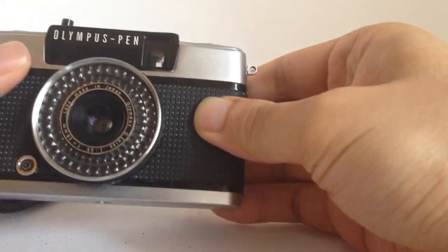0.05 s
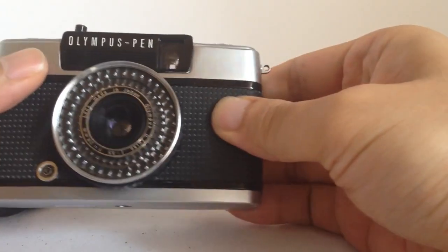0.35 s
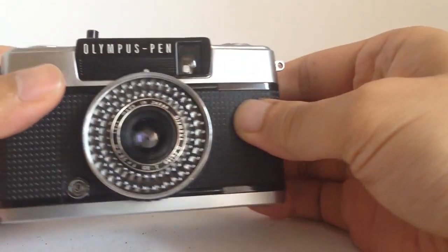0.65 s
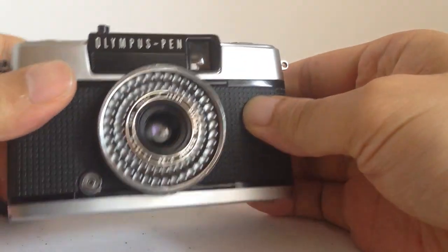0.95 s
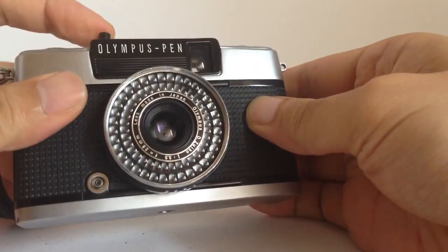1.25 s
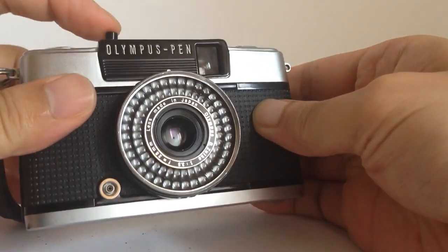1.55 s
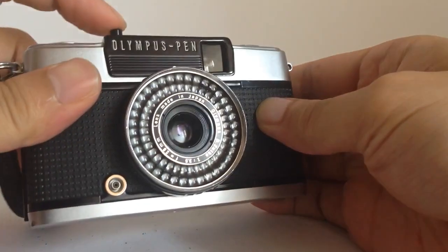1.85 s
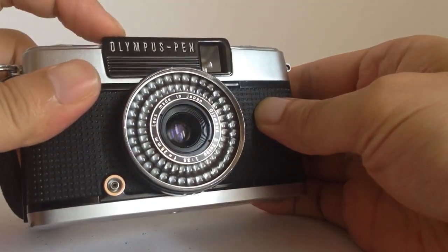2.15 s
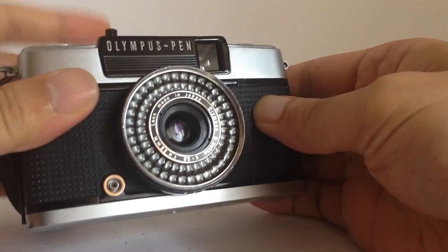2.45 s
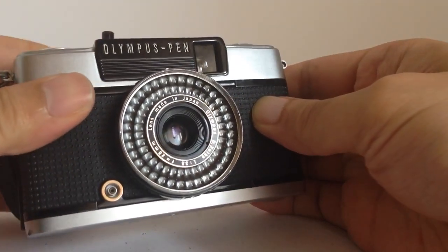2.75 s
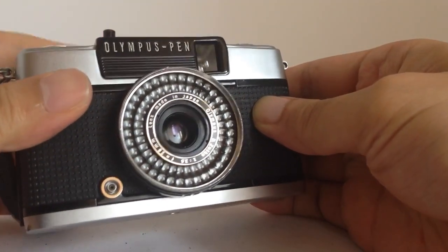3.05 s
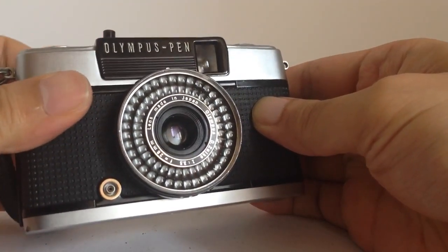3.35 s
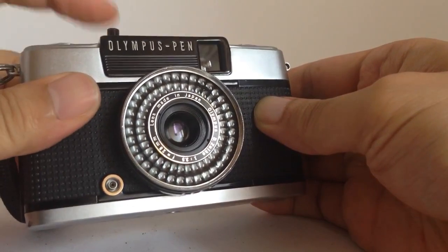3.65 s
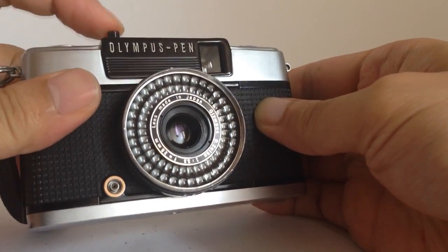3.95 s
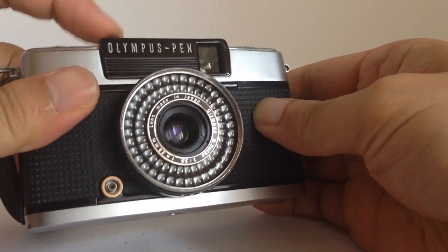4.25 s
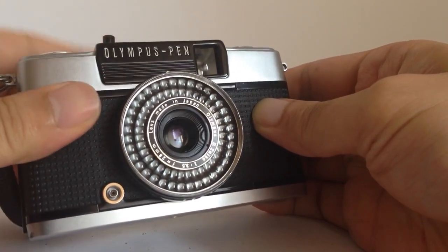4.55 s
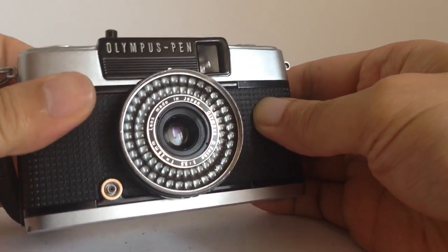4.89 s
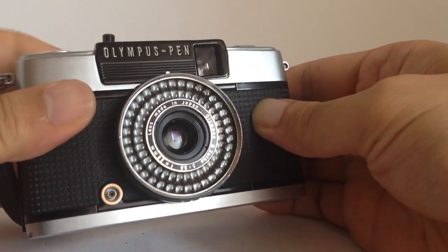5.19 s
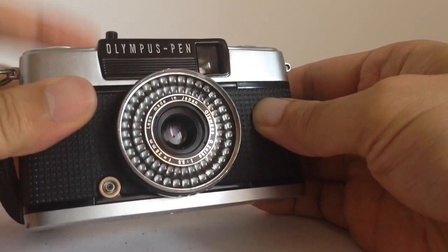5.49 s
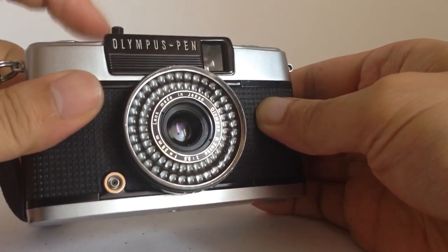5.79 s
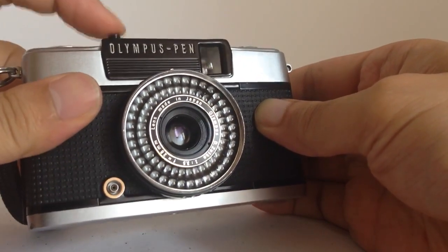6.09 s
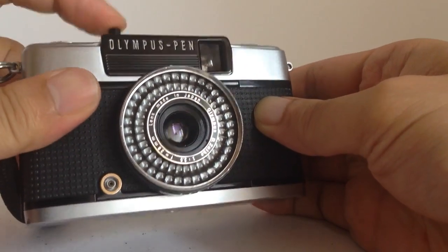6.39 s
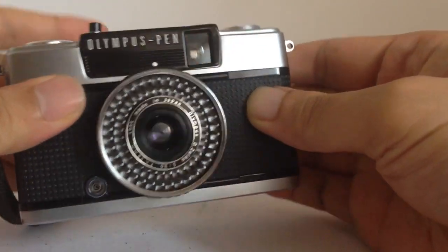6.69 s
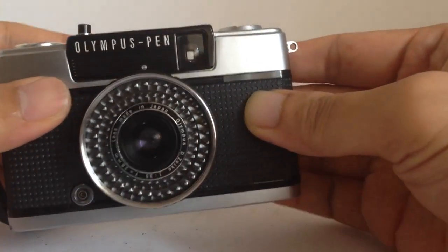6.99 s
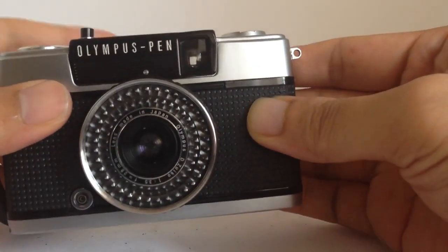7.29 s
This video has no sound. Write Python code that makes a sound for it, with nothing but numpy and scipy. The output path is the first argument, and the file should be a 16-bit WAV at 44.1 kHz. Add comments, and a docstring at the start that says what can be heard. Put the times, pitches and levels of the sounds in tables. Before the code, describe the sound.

A small film camera is handled close to the microphone in a quiet room with a short reverberation and a low hush. Right at the start its thumb wheel ratchets in a quick run of clicks, followed by a few separate ticks and gear knocks until about 1.2 seconds. At about 2.1 seconds the button latches and the shutter snaps, sharp and metallic with a tiny rattle; the button springs back at 2.4. Winding comes again in fast bursts from 2.9 to 3.6 seconds, the shutter fires at 4.2 and the button returns at 4.4. More ratcheting runs from 4.8 to 5.6 seconds, ending in a firm knock. The third shutter snap falls at 6.3, with the button's release at 6.5. A last winding run and several gear knocks fill 7.1 to 7.5 seconds. Faint finger rubs and soft bumps on the case come in between.

```python
"""Winding and firing a film camera

A small camera is wound and fired three times, close by, in a quiet room. Each click is an impact that
excites the resonant modes of the case: a pawl snaps over the thumb wheel's teeth, gears take up their
play, the button latches, the shutter opens, shuts and rebounds, and the button springs back.
Fingers rub and bump the case; the room adds a short reverberation and a low hush."""
import sys
import numpy as np
from scipy import signal
from scipy.fft import rfft, irfft
from scipy.io import wavfile
from scipy.ndimage import uniform_filter1d

SR = 44100
rng = np.random.default_rng(int(sys.argv[2]) if len(sys.argv) > 2 else 0)


def log_audio(samples):
    """Write samples as a 16-bit WAV file to the path given in sys.argv[1]."""
    # one column per channel
    frames = np.atleast_2d(samples).T
    # limit to full scale, then quantise
    limited = np.clip(frames, -1, 1)
    pcm = np.round(limited * 32767).astype(np.int16)
    wavfile.write(sys.argv[1], SR, pcm)


N = 332073


def amp(db):
    """Amplitude ratio of a level in decibels."""
    return 10 ** (np.asarray(db) / 20)


def unit(x):
    """Normalisation to unit energy."""
    return x / np.sqrt(np.sum(x ** 2) + 1e-20)


def curve_at(points, hz):
    """Interpolation on a logarithmic frequency axis."""
    freqs, values = np.transpose(points)
    return np.interp(np.log(hz + 1), np.log(freqs + 1), values)


def add(mix, start_s, sound):
    """Superposition: a sound joins the mix at start_s."""
    part = mix[max(round(start_s * SR), 0):][:len(sound)]
    part += sound[:len(part)]


def noise(spectrum):
    """Spectral shaping of white noise, scaled to an rms of 1."""
    gain = amp(curve_at(spectrum, np.fft.rfftfreq(N, 1 / SR)))
    return np.sqrt(N) * unit(irfft(rfft(rng.standard_normal(N)) * gain, N))


def minimum_phase(gain):
    """Causality: the impulse response with this gain that starts at once and dies away."""
    log_gain = np.log(np.maximum(gain, 1e-5))
    mirrored = np.r_[log_gain, log_gain[-2:0:-1]]
    return np.fft.ifft(np.exp(np.conj(signal.hilbert(mirrored)))).real


def case_response(modes, hz, cutoff_hz, spread):
    """Modal summation: resonances add in power, and the small case radiates little below cutoff_hz."""
    power = 0
    for pitch_hz, bandwidth_hz, db in modes:
        widening = spread if pitch_hz > 3000 else 1
        detuning = (hz - pitch_hz ** 2 / hz) / (bandwidth_hz * widening)
        power += amp(db) ** 2 / widening / (1 + detuning ** 2)
    power *= 1 / (1 + (cutoff_hz / hz) ** 8) + amp(-24) * hz ** 2 / (hz ** 2 + cutoff_hz ** 2)
    return np.sqrt(power / power.mean())


def contact_force(t, rise_s, hold_s):
    """Broadband excitation: a flurry of hard metal contacts drives all frequencies alike."""
    age = np.maximum(t, 0)
    envelope = (1 - np.exp(-age / rise_s)) * np.exp(-(age / hold_s) ** 2)
    spectrum = rfft(envelope * rng.standard_normal(len(t)))
    spectrum /= np.sqrt(abs(uniform_filter1d(abs(spectrum) ** 2, size=60)) + 1e-12)
    return unit(irfft(spectrum) * (t > 0))


# An impact row is: start_s, level_db, body_db, edge_db, slide_db. Levels are relative; body_db lifts
# the band under 3 kHz, edge_db the band over 6.2 kHz, and slide_db sets the slide against the snap.
def impacts(rows, modes, gain_db, cutoff_hz, rise_s, hold_s, rattle_db, rattle_t60_s, slide_s,
            spread=1, snap_spread=1):
    """Source and filter: a part slides, snaps over its edge and rattles, all through the case's modes."""
    size, lead_s = 4096, 0.01
    t = np.arange(size) / SR - lead_s
    hz = np.fft.rfftfreq(size, 1 / SR) + 1
    age, out = np.maximum(t, 0), np.zeros(N)
    tight = case_response(modes, hz, cutoff_hz, snap_spread)
    loose = case_response(modes, hz, cutoff_hz, spread)  # loose parts blur the upper resonances
    body_band = 1 / (1 + (hz / 3000) ** 8)
    edge_band = 1 / (1 + (6200 / hz) ** 8)
    slide_envelope = np.clip((t + slide_s) * SR / 20, 0, 1) * (t < 0)
    rattle_envelope = (1 - np.exp(-age / hold_s)) * amp(-60 * age / rattle_t60_s)
    for start_s, db, body_db, edge_db, slide_db in rows:
        slide = amp(slide_db) * unit(rng.standard_normal(size) * slide_envelope)
        rattle = amp(rattle_db) * unit(rng.standard_normal(size) * rattle_envelope)
        snap = contact_force(t, rise_s, hold_s)
        colour = amp(db + gain_db + body_db * body_band + edge_db * edge_band)
        for force, case in (snap, tight), (slide + rattle, loose):
            response = minimum_phase(case * colour)[:size // 2]
            add(out, start_s - lead_s, signal.fftconvolve(force, response))
    return out


def placed(pattern, start_s, strength_db):
    """Time shift and gain applied to a pattern of impact rows."""
    return [(start_s + delay_s, db + strength_db, *colour) for delay_s, db, *colour in pattern]


def with_ring(row, ring_db):
    """Band emphasis: an impact's 3-6 kHz ring changes while its body and edge stay level."""
    start_s, db, body_db, edge_db, slide_db = row
    return start_s, db + ring_db, body_db - ring_db, edge_db - ring_db, slide_db


# spectrum of the room's background: frequency_hz, level_db
HUSH_SPECTRUM = [(12, -26), (20, 1), (122, -1), (171, -5.5), (213, -8.5), (282, -8.5), (324, -10.5),
                 (452, -12), (686, -17), (767, -14.5), (932, -21.5), (4070, -17), (5690, -18),
                 (13900, -20.5), (15500, -21.5)]
def hush():
    """Stationary noise, strongest in the bass."""
    return amp(-65) * noise(HUSH_SPECTRUM)


# reverberation time: frequency_hz, t60_s
ROOM_DECAY = [(300, 0.18), (900, 0.12), (2000, 0.11), (4200, .15), (8000, 0.17), (15000, 0.054)]
# spectrum of the tail: frequency_hz, level_db
ROOM_SPECTRUM = [(300, 0), (900, -3), (1700, 2), (2600, 8), (3550, -0.5), (4150, -5), (4800, -4),
                 (8000, -8), (15000, 2)]
def room(x, tail_db=-13.5, onset_s=0.0017, echo_s=0.039, echo_db=-39):
    """Reverberation: a diffuse tail, each band decaying at its own rate, and one echo off a wall."""
    t = np.arange(SR // 2) / SR
    reflections = rng.standard_normal(len(t)) * np.clip((t - onset_s) / 0.0077, 0, 1)
    hz, age, bands = signal.stft(reflections, SR, nperseg=256)
    bands *= amp(curve_at(ROOM_SPECTRUM, hz)[:, None] - 60 * age / curve_at(ROOM_DECAY, hz)[:, None])
    response = amp(tail_db) * unit(signal.istft(bands, SR, nperseg=256)[1])
    response[round(echo_s * SR)] += amp(echo_db)
    return signal.fftconvolve(x, response)[:N]


# skin sliding on the case: start_s, length_s, level_db
SKIN_RUBS = [(1.464, 0.16, -64), (1.79, 0.25, -63), (3.042, 0.069, -66), (6.876, 0.091, -62.5),
             (7.082, 0.085, -57.5), (7.183, 0.093, -63.5)]
# spectrum of the rubbing: frequency_hz, level_db
RUB_SPECTRUM = [(24, -37.5), (40, -16), (140, -0.5), (254, -13), (407, -11), (469, -19), (563, -20.5),
                (900, -26), (1170, -58), (1980, -120)]
def finger_rubs():
    """Friction noise swells and fades with the pressure of the skin."""
    pressure = np.zeros(N)
    for start_s, length_s, db in SKIN_RUBS:
        add(pressure, start_s, amp(db) * signal.windows.tukey(round(length_s * SR), 0.6))
    return pressure * noise(RUB_SPECTRUM)


# soft blows on the case: start_s, level_db, pitch_hz, t60_s
FINGER_BUMPS = [(1.555, -52.5, 135, 0.17), (2.355, -54, 71, 0.096), (3.248, -41, 94, 0.07),
                (4.107, -44, 123, 0.081), (5.247, -45, 90, .07), (5.421, -48, 85, 0.059),
                (5.962, -42, 86, 0.07), (6.504, -47, 79.8, 0.11), (6.56, -53.5, 70, 0.088)]
def finger_bumps():
    """Damped oscillation: flesh quickly absorbs a low mode and a weaker upper one."""
    t, out = np.arange(SR // 3) / SR, np.zeros(N)
    for start_s, db, hz, t60_s in FINGER_BUMPS:
        wave = np.sin(2 * np.pi * hz * t) + 0.22 * np.sin(2 * np.pi * hz * 1.6 * t)
        envelope = amp(db - 60 * t / t60_s) * (1 - np.exp(-t / 0.002))
        add(out, start_s, envelope * wave)
    return out


# small shifts of the grip: start_s, level_db
GRIP_SHIFTS = [(1.134, -43.5), (1.553, -48), (1.863, -50), (1.909, -54.5), (2.9, -48), (5.273, -46),
               (5.884, -48.5), (6.212, -45), (6.792, -49), (7.063, -48)]
def grip_ticks():
    """Weak impulses: the shifting grip excites the same modes as the gears do."""
    ticks = [(start_s, db, 0, 0, -12) for start_s, db in GRIP_SHIFTS]
    return impacts(ticks, GEAR_MODES, gain_db=9.5, cutoff_hz=498, rise_s=0.0005, hold_s=0.0019,
                   rattle_db=1.5, rattle_t60_s=0.15, slide_s=0.0022)


# springs and thin plates: pitch_hz, level_db, t60_s
SPRING_MODES = [(778, -70.5, .55), (1622, -76, .14), (2055, -70.5, .1), (3720, -75, .16), (4100, -82, .22),
                (4425, -76, .26)]
def springs(x):
    """Sympathetic vibration: lightly damped parts pick up each blow and ring on."""
    t = np.arange(SR // 2) / SR
    ring = sum(amp(db - 60 * t / t60_s) * np.sin(2 * np.pi * hz * t) for hz, db, t60_s in SPRING_MODES)
    return signal.fftconvolve(x, ring)[:N]


# the back door, damped by the hands: nominal_pitch_hz, level_db, t60_s
BACK_DOOR_MODES = [(330, -24, .06), (430, -20, .05), (735, -2, .038), (850, -6, .033)]
def back_door(jolts, rise_s, pitch_ratio, gain_db):
    """Plate vibration: the thin door swings into a short hollow boom just after each jolt."""
    t, out = np.arange(SR // 8) / SR, np.zeros(N)
    swell = 1 - np.exp(-t / rise_s)
    for start_s, jolt_db in jolts:
        tuning = pitch_ratio * (1 + 0.025 * rng.uniform(-0.89, 1))  # the grip shifts the pitch a little
        boom = sum(amp(db - 60 * t / t60_s) * np.sin(2 * np.pi * hz * tuning * t)
                   for hz, db, t60_s in BACK_DOOR_MODES)
        add(out, start_s + 0.0015, amp(jolt_db + gain_db) * swell * boom)
    return out


# the case as the lever strikes it: pitch_hz, bandwidth_hz, level_db
LEVER_MODES = [(760, 110, -7), (1700, 90, 3), (4300, 900, -23), (9000, 3000, -23)]
# returns of the lever: start_s, level_db
LEVER_RETURNS = [(2.4462, -30.5), (4.5, -31.5), (6.569, -32.5)]
def lever():
    """A light impact, mostly rattle: a lever resets once the button is up."""
    clicks = [(start_s, db, 0, 0, -21) for start_s, db in LEVER_RETURNS]
    return impacts(clicks, LEVER_MODES, gain_db=-4.5, cutoff_hz=650, rise_s=0.00037, hold_s=0.0013,
                   rattle_db=6.5, rattle_t60_s=0.018, slide_s=0.0026)


# the case as the gears strike it: pitch_hz, bandwidth_hz, level_db
GEAR_MODES = [(820, 59, -2), (1317, 210, -8.5), (1672, 89, -1.5), (2095, 400, -8), (2510, 31, -7),
              (3080, 2000, -16), (4130, 630, -8.5), (4740, 370, -11), (5790, 250, -9.5), (7520, 990, -15.5),
              (9500, 1100, -29), (14300, 212, -32.5)]
# gear teeth meeting: start_s, level_db, body_db, edge_db
BACKLASH_KNOCKS = [(.2638, -38, 11.5, -4), (0.274, -15.5, 0.5, 6.5), (1.1553, -30, -7, 2),
                   (1.164, -15, 1.5, -11), (2.8766, -28.5, -1.5, -3), (3.0905, -14, 0.5, -0.5),
                   (3.2515, -20.5, 3, -6.5), (3.6332, -17, -0.5, -4.5), (4.8073, -30, -10, -9),
                   (5.1209, -14, -1, -7.5), (5.2475, -39, 3, -5), (5.5992, -9.5, 2, -2.5),
                   (5.9645, -36.5, 11.5, -7), (7.333, -16.5, -3, -18), (7.3448, -18, 5.5, -10),
                   (7.3565, -20.5, -5, 3), (7.4887, -22.5, 0.5, -7), (7.5074, -29, 11, -7)]
def gears(slide_db=-11):
    """Backlash: the gears knock as they take up their play, and sharp knocks jolt the door."""
    rows = [(*knock, slide_db) for knock in BACKLASH_KNOCKS]
    knocks = impacts(rows, GEAR_MODES, gain_db=1.5, cutoff_hz=664, rise_s=0.000098, hold_s=0.0028,
                     rattle_db=-4, rattle_t60_s=0.036, slide_s=0.0036)
    jolts = [(start_s, db + edge_db) for start_s, db, _, edge_db in BACKLASH_KNOCKS]
    # a winding hand holds the door tighter, which raises its pitch
    return knocks + back_door(jolts, rise_s=0.00087, pitch_ratio=1.103, gain_db=-27.5)


def pawl_snaps(stroke, easy_teeth_per_s=60):
    """An impulse train: one snap for each tooth, at a rate set by the speed of the wheel."""
    start_s, count, db, body_db, edge_db, slide_db, speeds = stroke
    log_speed = np.polyfit(np.linspace(0, 1, len(speeds)), np.log(speeds), len(speeds) - 1)
    rows = []
    for tooth in range(count):
        progress = min(tooth / max(count - 2, 1), 1)
        speed = np.exp(np.polyval(log_speed, progress))
        octaves = np.log2(speed / easy_teeth_per_s)  # a faster wheel sounds fuller and sharper
        ease_db = -0.5 if tooth == count - 1 else 0  # the thumb eases off
        snap = (start_s, db + ease_db, body_db + 3 * octaves, edge_db + 2.5 * octaves,
                slide_db - 3.5 * tooth)
        rows.append(with_ring(snap, -0.34 * tooth))  # slide and ring fade as the push goes on
        start_s += 1 / speed
    return rows


# the case as the pawl strikes it: pitch_hz, bandwidth_hz, level_db
PAWL_MODES = [(776, 56, -3.5), (1111, 56, -4.5), (1635, 187, -2.1), (2056, 90, 1), (2495, 99, -5.5),
              (3887, 320, -2), (4205, 130, -1), (4825, 200, -3.5), (5450, 280, -3.5), (7390, 740, -6.5),
              (8160, 220, -4.5), (9570, 200, -9.5), (10300, 530, -10.5), (13200, 920, -16),
              (15600, 4400, -22.5)]
# a side panel, free until the hand closes: pitch_hz, bandwidth_hz, level_db
PANEL_MODES = [(2140, 120, 3.5)]
# pushes on the wheel: start_s, tooth_count, level_db, body_db, edge_db, slide_db, speeds_teeth_per_s
THUMB_STROKES = [(0.0459, 9, -8.5, -2.5, 3, -30, [35.7, 81.4, 61.9, 57.4]),
                 (0.5533, 2, -11, 1.5, 5.5, -29, [41.7]), (2.9113, 3, -4, -1.5, -4, -6.5, [68, 60]),
                 (2.963, 11, -5, -5.5, -4.5, -10, [66.5, 170, 158.6]), (3.0673, 2, -5, -1, -3.5, -19, [53]),
                 (3.3139, 6, -6, -3.5, -3.5, -19, [76.3, 104.4, 86, 76.3]),
                 (4.8475, 11, -3.5, -3.5, -4, -2.5, [32.9, 63.4, 33.1]),
                 (5.319, 9, -5.5, -2.5, -4.5, -26, [52.9, 76, 78.9, 123.5]),
                 (5.5762, 1, -8.5, -6, -13, -32, [43]),
                 (7.1265, 11, -8, -1.5, 0, -2, [29.82, 91.8, 132.2, 55])]
def winding(grip_closes_s=1):
    """Ratchet action: the pawl rings the case, and a side panel too until the grip damps it."""
    early, late = [], []
    for stroke in THUMB_STROKES:
        snaps = early if stroke[0] < grip_closes_s else late
        snaps.extend(pawl_snaps(stroke))
    loose_grip = impacts(early, PAWL_MODES + PANEL_MODES, gain_db=-0.5, cutoff_hz=860, rise_s=0.0002,
                         hold_s=0.0021, rattle_db=-4.5, rattle_t60_s=0.037, slide_s=0.0057)
    firm_grip = impacts(late, PAWL_MODES, gain_db=-2, cutoff_hz=760, rise_s=0.00023, hold_s=0.002,
                        rattle_db=-3.5, rattle_t60_s=0.037, slide_s=0.00454)
    return loose_grip + firm_grip


# the case as the button strikes it: pitch_hz, bandwidth_hz, level_db
BUTTON_MODES = [(779, 38, 2), (1300, 104, -3.5), (1670, 144, -7), (2040, 96, -1), (2623, 210, -9),
                (3980, 400, -2), (4250, 100, -2.5), (4700, 100, -5.5), (5330, 300, -5), (6930, 350, -4.5),
                (7780, 110, -3), (9400, 674, -11), (11980, 376, -12.5), (14654, 2000, -13)]
# the button goes down: latch_s, strength_db
BUTTON_PRESSES = [(2.0463, -0.5), (4.1269, 0.5), (6.2545, -1)]
# the button is let go: start_s, travel_s, strength_db
BUTTON_RELEASES = [(2.3577, 0.027, -0.5), (4.4146, .0254, -1), (6.5029, .0257, 2)]
# touch and latch, unlatch and scrape, top stop: delay_s, level_db, body_db, edge_db, slide_db
LATCH_CLICKS = [(-.0045, -11, -5.5, -2.5, -15), (0, -5, -0.5, 2.5, -8)]
UNLATCH_CLICKS = [(0, -14, 3, 1, -13), (.0069, -18.5, 5, 8.5, -10)]
STOP_CLICK = [(0.00063, -10, -8, 0, -29)]
def button():
    """Elastic return: the button latches going down; let go, it springs up and strikes its stop."""
    clicks = []
    for latch_s, db in BUTTON_PRESSES:
        clicks += placed(LATCH_CLICKS, latch_s, db)
    for start_s, travel_s, db in BUTTON_RELEASES:
        clicks += placed(UNLATCH_CLICKS, start_s, db) + placed(STOP_CLICK, start_s + travel_s, db)
    return impacts(clicks, BUTTON_MODES, gain_db=0, cutoff_hz=773, rise_s=0.00022, hold_s=0.0033,
                   rattle_db=-3, rattle_t60_s=0.038, slide_s=0.0046, spread=2.1)


def blade_rebounds(count=3, first_gap_s=0.0211, restitution=0.9):
    """Inelastic collision: each rebound comes sooner, weaker and duller than the last."""
    delays_s = np.cumsum(first_gap_s * restitution ** np.arange(count))
    first_db = np.array([-7.5, 2, -3, -26.5])  # level_db, body_db, edge_db, slide_db
    step_db = np.array([-4, -1, -3.3, -1])
    return [(delay_s, *(first_db + k * step_db)) for k, delay_s in enumerate(delays_s)]


# the case as the blades strike it: pitch_hz, bandwidth_hz, level_db
SHUTTER_MODES = [(738, 84, -7.5), (817, 44, -47.5), (1160, 186, -15), (1668, 103, -6.5), (2018, 24, -7),
                 (2477, 54, -14), (4100, 220, -12), (4137, 140, 1.5), (4940, 307, -19.5), (5460, 160, -9),
                 (7100, 270, -12.5), (8060, 430, -13.5), (10170, 860, -18), (12483, 680, -16.5),
                 (13320, 134, -23), (14300, 2600, -23.1)]
# one blow to open, two to shut: delay_s, level_db, body_db, edge_db, slide_db
OPENING_BLOW = [(0.00007, 2.5, 3.5, 2, -17)]
CLOSING_BLOWS = [(0, 5.6, -5, -2, -22), (.0054, 3.8, 2, 4, -22.5)]
# firings of the shutter: start_s, open_s, opening_ring_db, rebound_db
EXPOSURES = [(2.086, 0.021, 5.5, -.5), (4.213, 0.022, 2, 1), (6.2856, .0221, -3.5, -0.5)]
def shutter():
    """Impact excitation: the blades snap open and shut, then rebound; each blow jolts the door."""
    hard, weak = [], []
    for start_s, open_s, ring_db, rebound_db in EXPOSURES:
        hard += [with_ring(row, ring_db) for row in placed(OPENING_BLOW, start_s, 0)]
        hard += placed(CLOSING_BLOWS, start_s + open_s, 0)
        weak += placed(blade_rebounds(), start_s + open_s, rebound_db)
    # hard blows ring the blades at one pitch; weak rebounds only stir the linkage
    snaps = impacts(hard, SHUTTER_MODES, gain_db=0, cutoff_hz=560, rise_s=0.0003, hold_s=0.0026,
                    rattle_db=-8, rattle_t60_s=0.04, slide_s=0.0041, spread=5.7)
    rebounds = impacts(weak, SHUTTER_MODES, gain_db=0, cutoff_hz=614, rise_s=0.0005, hold_s=0.0049,
                       rattle_db=-2, rattle_t60_s=0.05, slide_s=0.00426, spread=5.3, snap_spread=4)
    jolts = [(start_s, db + body_db) for start_s, db, body_db, *_ in hard + weak]
    return snaps + rebounds + back_door(jolts, rise_s=0.0023, pitch_ratio=1, gain_db=-32.5)


def scene():
    """Superposition of the camera's direct sound, its reverberation and the hush."""
    mechanism = lever() + gears() + winding() + button() + shutter()
    hands = finger_rubs() + finger_bumps() + grip_ticks()
    camera = mechanism + springs(mechanism) + hands
    return (camera + room(camera) + hush())[None, :]


def record(dry):
    """Band limiting: the small microphone loses the lowest bass, and a low-pass cuts the top treble."""
    highpass = signal.butter(2, 30, "highpass", fs=SR, output="sos")
    lowpass = signal.firwin(255, 15400, window=("kaiser", 8), fs=SR)
    return signal.oaconvolve(signal.sosfilt(highpass, dry), lowpass[None], "same")


dry = scene()
out = record(dry)
log_audio(out)
```